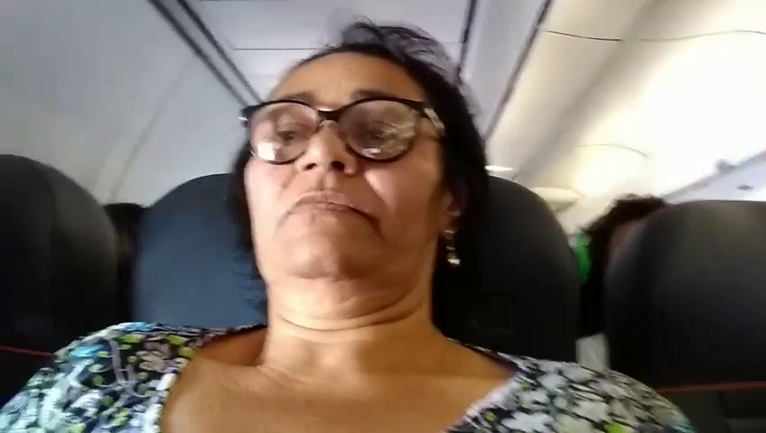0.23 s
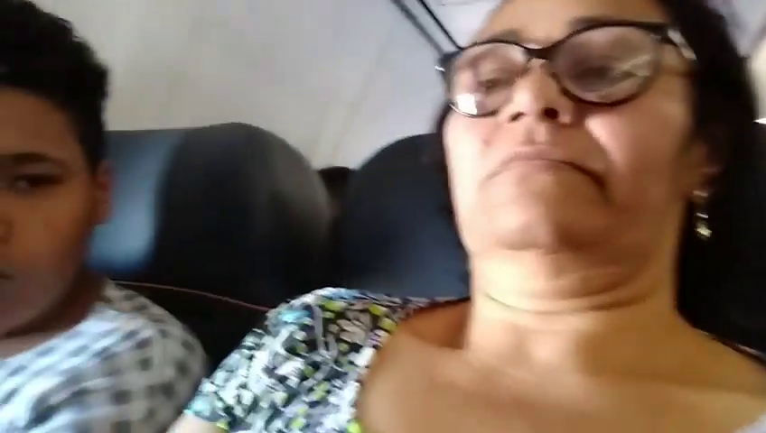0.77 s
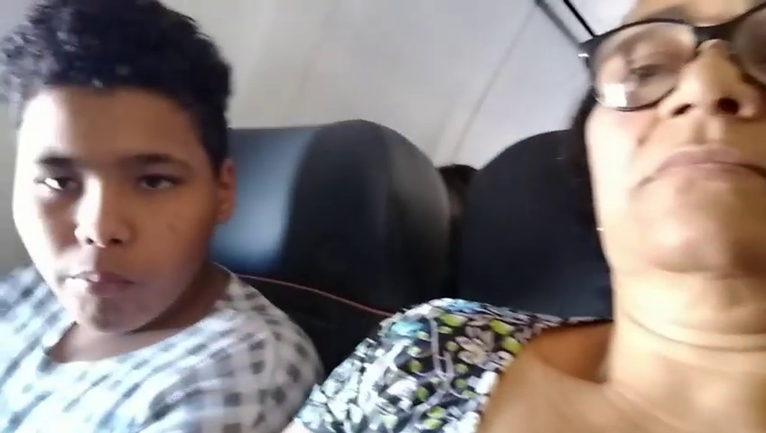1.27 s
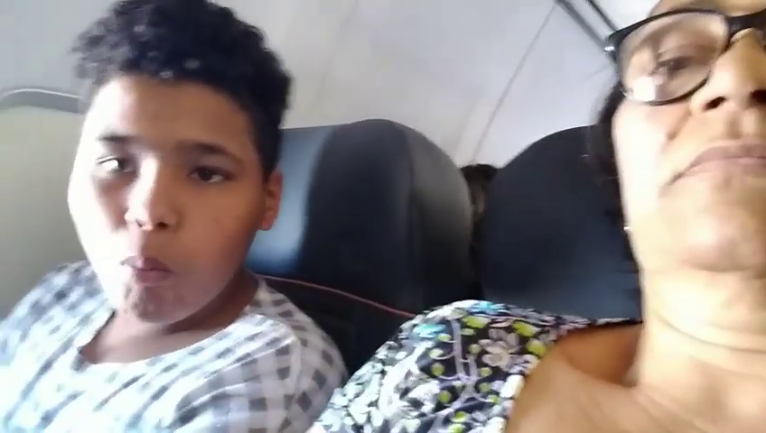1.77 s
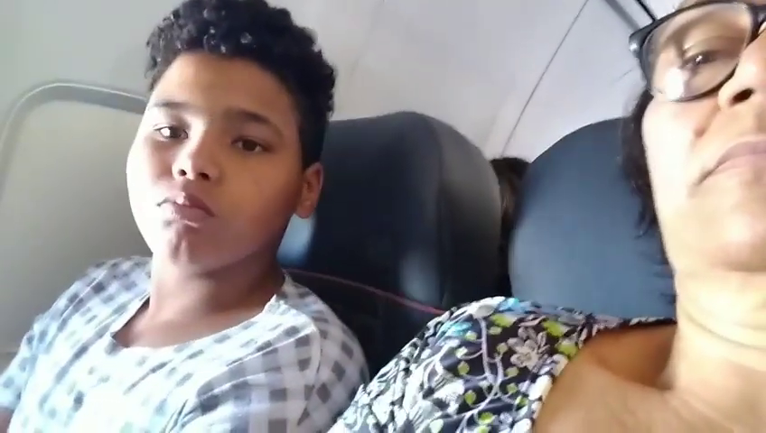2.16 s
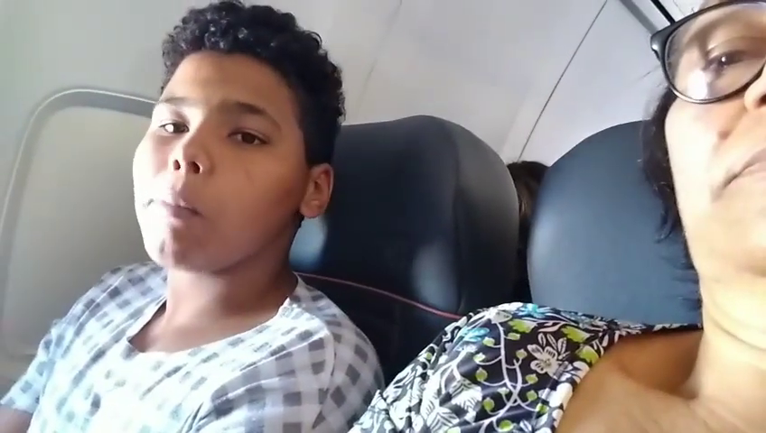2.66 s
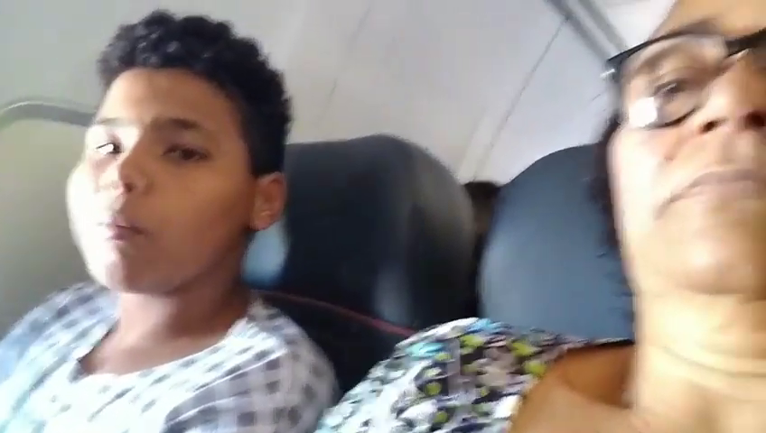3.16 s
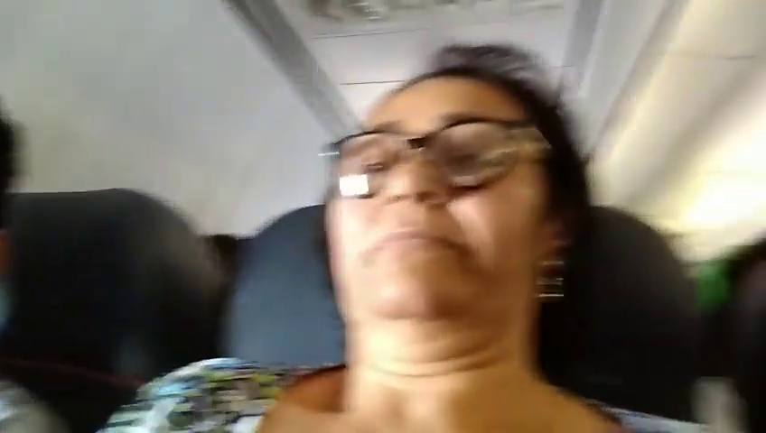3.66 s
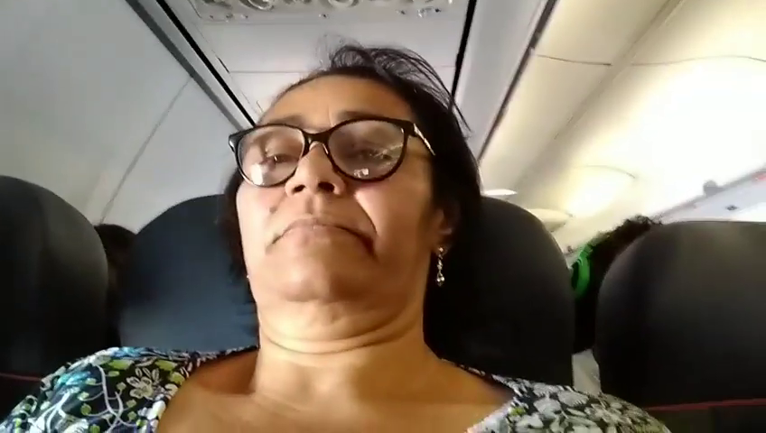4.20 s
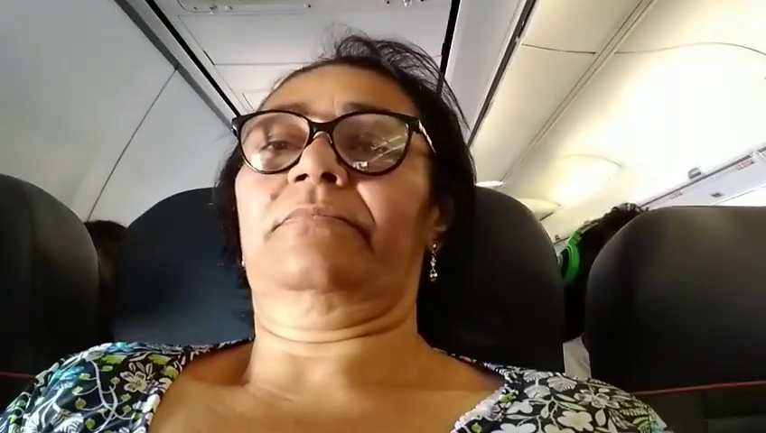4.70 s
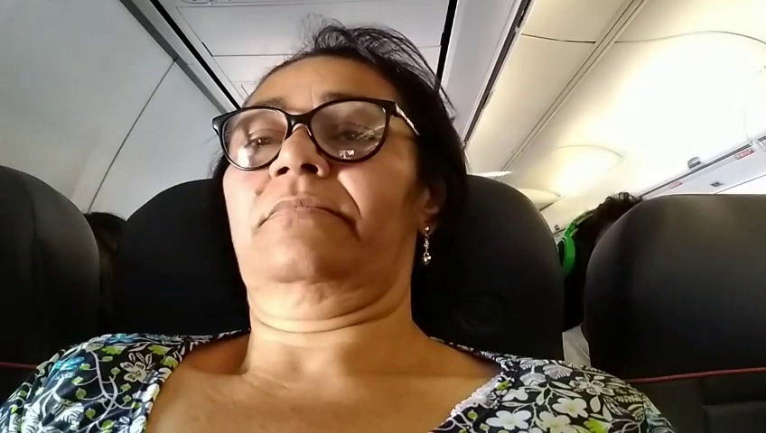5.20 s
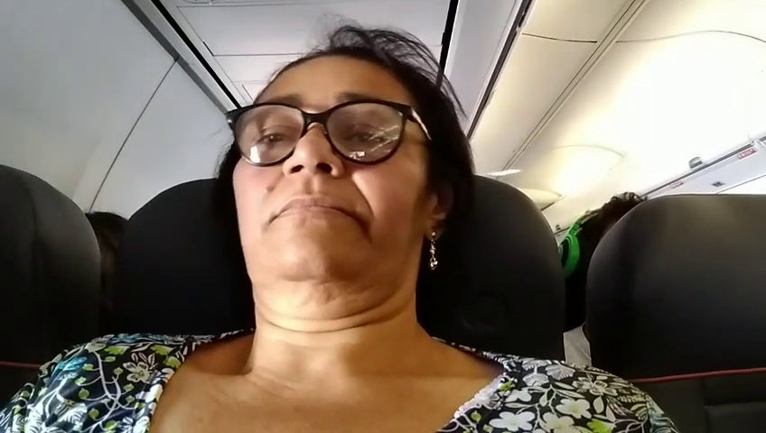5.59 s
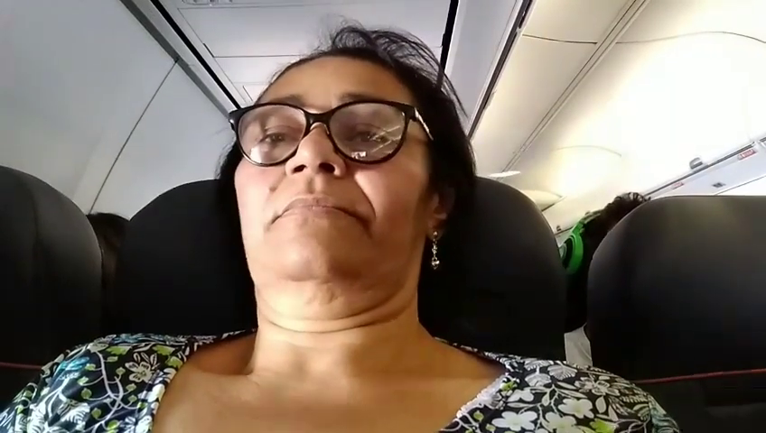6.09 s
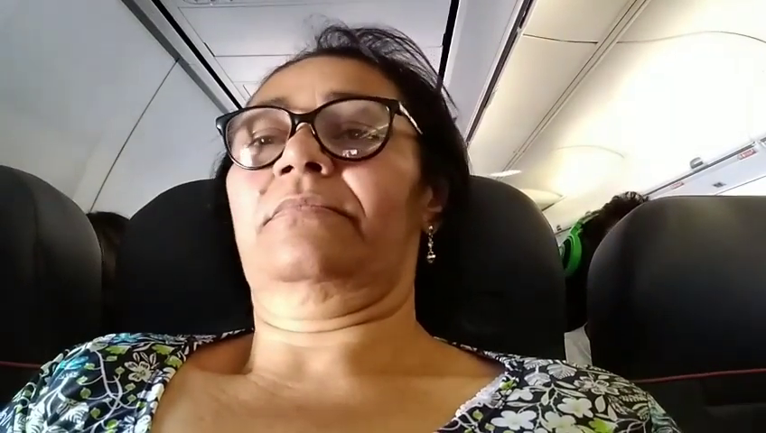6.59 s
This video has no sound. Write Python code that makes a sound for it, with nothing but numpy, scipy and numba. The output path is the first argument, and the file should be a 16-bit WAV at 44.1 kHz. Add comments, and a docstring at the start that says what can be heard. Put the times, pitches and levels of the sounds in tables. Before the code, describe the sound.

Close hand-held stereo phone pickup in an airliner cabin: bassy, enveloping, gently fluctuating rumble with little treble. Tiny finger ticks on the phone case appear in the middle, with barely audible fabric rubs. Then a tight burst of clicks at the right, each stronger, ends in a violent pop. The background is pushed down for a moment and swells back, carrying on steadily to the end.

```python
"""A steady airliner cabin roar runs throughout: boundary-layer and engine noise, diffuse, at a hand-held phone.
Dying noise bursts: fingers tick faintly before the finger snaps, and cloth brushes before and after them.
The snaps against the right port are suction pulses ringing its cavity; a feedback gain control ducks
and recovers. The phone subtracts each port's delayed signal from the other to aim left and right."""
import sys
import numpy as np
from scipy import signal
from scipy.fft import rfft, irfft, next_fast_len
from scipy.io import wavfile
from numba import njit

SR = 44100
rng = np.random.default_rng(int(sys.argv[2]) if len(sys.argv) > 2 else 0)


def store_wav(level_fs):
    """Save 16-bit WAV to argv[1]."""
    pcm = np.round(np.clip(np.atleast_2d(level_fs), -1, 1) * 32767)
    wavfile.write(sys.argv[1], SR, pcm.T.astype(np.int16))


N = 302085
SIZE = next_fast_len(N + 8192)
HZ = np.maximum(np.arange(SIZE // 2 + 1) * SR / SIZE, 1)
TIME_S = np.arange(N) / SR
PORT_LAG_S = 0.000474   # port spacing over the speed of sound

# Roar spectrum after aiming, relative: f/Hz, spectral level/dB per Hz
ROAR_SPECTRUM = [(32, -53), (45, -21), (70, -7.5), (125, 0.5), (330, -3.5), (425, -6.5), (465, -10),
                 (520, -10), (720, -12), (850, -15.5), (950, -23), (1150, -23.5), (1400, -29.5),
                 (1900, -31.5), (2600, -35.5), (3200, -41.5), (4400, -47), (5500, -52.5), (6600, -53),
                 (8000, -55), (10500, -55.5), (12500, -54), (14200, -59.5)]
# Cabin resonances and engine hums above the roar, after aiming: f/Hz, width/Hz, level/dB
HUM_PEAKS = [(54.8, 9.8, -40.5), (85.7, 13.5, -34.5), (104.9, 5.2, -33), (161.5, 40, -30.5),
             (298, 38, -32.5), (2720, 25, -68)]
# Treble level over time: t/s, level/dB
TREBLE_SWELL = [(0, 0.1), (2.3, 0.5), (2.8, 2), (4.2, 0.9), (4.5, 0.5), (5.0, 1.5), (5.6, -2.3), (6.3, 1),
                (6.85, 0)]
# Rumble level over time: t/s, level/dB
RUMBLE_LEVEL = [(0, 0), (.6, 1.5), (1.1, -1.5), (1.5, 0.9), (1.9, -0.5), (2.3, 0.5), (2.8, 0), (3.3, 1),
                (3.8, 0.5), (4.3, 0), (4.7, 1), (5.1, 0), (5.4, -0.5), (5.65, -0.5), (6.2, 0.1),
                (6.85, 0.6)]
ROAR_DB = -22   # roar before the hums are added
FLICKER_DB, SHARED_FLICKER = 0.4, 0.5   # each band's own treble flicker; common part relative to it


def roar(surge_db, slow_db, fast_db):
    """Diffuse field: partly coherent noise at two ports, its treble flickering more than its bass."""
    colour = from_db(at_hz(ROAR_SPECTRUM))
    colour = colour * from_db(ROAR_DB) / np.sqrt(np.mean(colour ** 2))
    for hz, width_hz, level_db in HUM_PEAKS:
        hum = 1 / (1 + (2 * (HZ - hz) / width_hz) ** 2)
        colour = np.hypot(colour, from_db(level_db) * hum / np.sqrt(np.mean(hum ** 2)))
    # alike ports cancel in the subtraction, so the bass at the ports is stronger
    taken, alike = subtraction(), likeness()
    colour = colour / np.sqrt(1 + np.abs(taken) ** 2 - 2 * alike * taken.real)

    common, apart = rfft(rng.standard_normal((2, SIZE)))
    in_phase = np.sqrt(0.5 + 0.5 * alike) * common
    opposed = np.sqrt(0.5 - 0.5 * alike) * apart * [[1], [-1]]
    ports = colour * (in_phase + opposed)

    swell, = in_time(TREBLE_SWELL)
    rumble, = in_time(RUMBLE_LEVEL)
    gust, surge = drift(17.0), surge_db * drift(22.0)
    centres = np.geomspace(60, 12000, num=9)
    out = 0
    for hz, band in zip(centres, bands(ports, centres)):
        treble_share = np.clip(np.log2(hz / 1200) / 2, 0, 1)
        flicker = fast_db * (SHARED_FLICKER * gust + drift(29))
        level_db = surge + slow_db * drift(2.4)
        level_db = level_db + (1.0 - treble_share) * rumble + treble_share * (swell + flicker)
        out = out + band * from_db(level_db)
    return out


# Upper bound on port coherence, left by local turbulence: f/Hz, likeness (0 to 1)
COHERENCE_BOUND = [(60, .985), (95, .975), (140, 0.93), (300, 0.96)]
DIFFUSE_LAG_S = 0.00036   # effective port spacing as a delay in the diffuse field


def likeness():
    """Spatial coherence: two points in a diffuse field are alike as sin(kd) / kd, less local turbulence."""
    return np.clip(at_hz(COHERENCE_BOUND), 0, 0.995) * np.sinc(2 * HZ * DIFFUSE_LAG_S)


# Finger snaps on the right port, drive levels before filtering and gain control:
# t/s, pulse peak level/dB, contact/s, thump level/dB, crackle level/dB
FINGER_SNAPS = [(4.2533, -9, 0.00055, -4, -44), (4.2772, -4.5, 0.00045, -6, -36),
                (4.30195, 5, 0.00034, -13, -18), (4.34217, 20.5, 0.00008, 9.5, -2)]
CAVITY_HZ, CAVITY_Q = 2950, 1.6   # the port cavity rings
VENT_HZ, VENT_Q = 150, 1.3   # the vent lets slow pressure out
CRACKLE_T60_S, CRACKLE_HZ, CRACKLE_TOP_HZ = 0.0045, 4800, 8000   # the skin crackles as it lets go
CRACKLE_LEFT_DB = -12   # the crackle is weaker at the far port
TAIL_HZ, TAIL_T60_S = 3200, 0.032   # a faint noise tail near 3.2 kHz follows each snap
TAIL_DB = -42   # relative to the pulse peak, then scaled by contact time and filtered
THUMP_HZ, THUMP_T60_S, THUMP_RISE_S = 119, 0.04, 0.0009   # the case jolts and swings back


def snaps():
    """Impulse excitation: suction pulses ring the right port cavity, with crackle, noise tail and low swing."""
    push = np.zeros(N) + 1e-18
    crackle = np.zeros((2, N)) + 1e-18
    thump_and_tail = np.zeros(N)
    age = np.arange(3000) / SR
    for s, peak_db, contact_s, thump_db, crackle_db in FINGER_SNAPS:
        start = round(s * SR)
        span = slice(start, start + len(age))
        push[span] -= from_db(peak_db) * np.sin(np.pi * np.clip(age / contact_s, 0, 1)) ** 2

        crackle_gain = from_db(crackle_db - 60 * age / CRACKLE_T60_S)
        crackle[:, span] += crackle_gain * rng.standard_normal((2, len(age)))

        tail = second_order(rng.standard_normal(len(age)), TAIL_HZ, 3.0, high=True)
        tail = second_order(tail, TAIL_HZ, 3.0, high=False)
        tail_gain = from_db(peak_db + TAIL_DB - 60 * age / TAIL_T60_S)
        thump_and_tail[span] += tail_gain * contact_s * TAIL_HZ * tail

        swing = np.cos(2 * np.pi * THUMP_HZ * age) * (1 - np.exp(-age / THUMP_RISE_S))
        thump_and_tail[span] += from_db(thump_db - 60 * age / THUMP_T60_S) * swing

    rung = second_order(push, CAVITY_HZ, CAVITY_Q, high=False) + 0.023 * push
    right = second_order(rung, VENT_HZ, VENT_Q, high=True) + thump_and_tail
    crackle = second_order(crackle, CRACKLE_HZ, 0.83, high=True)
    crackle = second_order(crackle, CRACKLE_TOP_HZ, 0.69, high=False)
    crackle[0] = np.roll(crackle[0], round(PORT_LAG_S * SR))   # reaches the left port later
    return right * [[0], [1]] + crackle * from_db([[CRACKLE_LEFT_DB], [0]])


def second_order(x, hz, q, high):
    """Damped resonance: a second-order low-pass or high-pass by the bilinear transform."""
    w = 2 * np.pi * hz
    zeros = [1, 0, 0] if high else [w ** 2]
    return signal.lfilter(*signal.bilinear(zeros, [1, w / q, w ** 2], SR), x)


# Finger ticks on the case: t/s, burst level before rise and decay/dB, centre f/Hz, half width/octaves
FINGER_TICKS = [(2.66, -39, 3000, .25), (2.669, -32, 3000, 0.37), (2.688, -35, 5000, 1.4),
                (2.714, -47, 11500, .2), (2.736, -38, 5500, 1.2), (2.904, -43, 5500, 0.22),
                (3.372, -40, 8000, .6), (3.383, -34.5, 7000, 1.2), (3.544, -52, 12500, .1),
                (3.605, -40, 3500, 0.2), (3.630, -39, 4800, 0.88), (3.781, -45, 8000, .8),
                (3.916, -41, 6300, 0.37), (4.078, -50, 12000, .3)]


def ticks():
    """Stick-slip friction: fingers on the case make brief, grainy noise bursts."""
    return bursts(FINGER_TICKS, rise_s=0.001, t60_s=0.013, grain_db=3)


# Cloth brushing past: t/s, burst level before rise and decay/dB, centre f/Hz, half width/octaves
CLOTH_BRUSHES = [(1.062, -52, 10000, .55), (1.442, -55, 7500, 0.41), (2.665, -57, 12000, .2),
                 (2.68, -55, 12500, .15), (2.706, -62, 11500, .2), (5.128, -54, 9000, .6),
                 (6.706, -46.5, 8000, 1.3)]


def brushes():
    """Rubbing noise: cloth brushing past makes softer, longer bursts without added grain."""
    return bursts(CLOTH_BRUSHES, rise_s=0.0036, t60_s=0.26, grain_db=0)


def bursts(rows, rise_s, t60_s, grain_db):
    """Exponential decay: band-limited noise bursts die away, independent at the two ports."""
    out, age = np.zeros((2, N)), np.arange(4000) / SR
    for s, level_db, hz, octaves in rows:
        edges = np.clip(hz * 2.0 ** np.array([-octaves, octaves]), 500, 18000)
        band = signal.butter(2, edges, "band", fs=SR, output="sos")
        noise = rng.standard_normal((2, len(age)))
        # grain: spread of the tiny slips inside a burst
        grain = from_db(grain_db * np.minimum(rng.exponential(1, len(age)), 5))
        burst = signal.sosfilt(band, noise * grain)
        envelope = np.minimum(age / rise_s, 1) * from_db(level_db - 60 * age / t60_s)
        start = round(s * SR)
        out[:, start:start + len(age)] += envelope * burst / burst.std()
    return out


def from_db(db):
    """Logarithmic level: decibels to amplitude gain."""
    return 10 ** (np.asarray(db) / 20)


def in_time(rows):
    """Linear interpolation: each column of a curve at every sample."""
    s, *columns = np.transpose(rows)
    return [np.interp(TIME_S, s, column) for column in columns]


def at_hz(points):
    """Logarithmic frequency: a table interpolated along a log axis."""
    points = np.array(points)
    return np.interp(np.log(HZ), np.log(points[:, 0]), points[:, 1])


def bands(spectrum, centres):
    """Complementary filters: overlapping bands that sum to the whole."""
    for k in range(len(centres)):
        share = np.interp(np.log(HZ), np.log(centres), np.arange(len(centres)) == k)
        yield irfft(spectrum * share, SIZE)[..., :N]


def drift(rate_hz):
    """Low-passed chance: two equal poles slow white noise, scaled to spread 1."""
    step = 40   # samples per drawn value
    r = np.exp(-2 * np.pi * step * rate_hz / SR)
    slow = signal.lfilter([1], [1, -2 * r, r * r], rng.standard_normal(N // step + 2002))
    slow = slow[2000:]   # drop the filter's start-up
    return np.interp(np.arange(N) / step, np.arange(len(slow)), slow / slow.std())


FAINT_TOP_HZ = 14450   # only the snaps carry above this


def scene():
    """Superposition: pressures of roar, handling and snaps add at the left and right ports."""
    steady = roar(surge_db=0.69, slow_db=0.76, fast_db=FLICKER_DB) + ticks() + brushes()
    faint_top = signal.cheby2(18, 55, FAINT_TOP_HZ, fs=SR, output="sos")
    return signal.sosfilt(faint_top, steady) + snaps()


# Cross-port subtraction: f/Hz, share of the other port subtracted (0 to 1)
CROSS_SHARE = [(50, 0.63), (3000, 0.63), (6000, 0.46), (9000, 0.048), (14000, 0.18)]


def subtraction():
    """Delay-and-subtract: share and phase delay of the other port that is taken away."""
    return np.clip(at_hz(CROSS_SHARE), 0, 0.97) * np.exp(-2j * np.pi * HZ * PORT_LAG_S)


def aim(ports):
    """Pressure-gradient directivity: each side is its port minus the delayed other port."""
    spectrum = rfft(ports, SIZE)
    return spectrum - subtraction() * spectrum[::-1]


ATTACK_S = 0.002   # smoothing time of the gain cut
LIMIT_DB, CUT_PER_DB = -4, 4.3   # dB of cut per dB of output over the limit
RELEASE_DB_PER_S = 12.7


@njit
def gain_control(peak, limit_db, cut_per_db, release_db, follow):
    """Feedback compression: a clipped output peak over the limit cuts the gain; it recovers steadily in dB."""
    gain, goal_db, cut_db = np.empty(len(peak)), 0., 0.
    for i in range(len(peak)):
        gain[i] = 10 ** (-cut_db / 20)
        over_db = 20 * np.log10(min(peak[i] * gain[i], 1.) + 1e-9) - limit_db
        goal_db = max(goal_db - release_db, max(cut_per_db * over_db, 0.))
        cut_db += follow * (goal_db - cut_db)
    return gain


# Grip shading of the sides, shifting after the snaps:
# f/Hz, right before level/dB, left after level/dB, right after level/dB
GRIP_SHADE = [(113, -4.5, 1, -8.5), (230, -2, 2.5, -2.5), (437, -1.2, 1, -2.5), (1020, -1, 0.95, -0.6),
              (3000, -1.7, 0.7, 0.1), (5200, -0.8, 1.5, 1), (7800, 0, 1.2, -3), (12000, -1.5, 0, -15)]
SHIFT_S, SHIFT_LENGTH_S = 4.5, 0.22   # the hand settles into its new hold
CLIP, CUTOFF_HZ = 0.95, 16300   # clipping amplitude, before the final low-pass


def record(dry):
    """Transducer chain: aimed pair, grip shading, gain control, clipping, cut-off."""
    moved = np.clip((TIME_S - SHIFT_S) / SHIFT_LENGTH_S, 0, 1)
    parts = bands(aim(dry), [row[0] for row in GRIP_SHADE])
    pair = 0
    for band, (hz, before_db, left_db, after_db) in zip(parts, GRIP_SHADE):
        right_db = before_db + (after_db - before_db) * moved
        pair = pair + band * from_db([left_db * moved, right_db])
    peak = np.abs(pair).max(axis=0)
    gain = gain_control(peak, LIMIT_DB, CUT_PER_DB, RELEASE_DB_PER_S / SR, 1 / (ATTACK_S * SR))
    cutoff = signal.cheby2(12, 55, CUTOFF_HZ, fs=SR, output="sos")
    return signal.sosfilt(cutoff, np.clip(pair * gain, -CLIP, CLIP))


dry = scene()
out = record(dry)
store_wav(out)
```